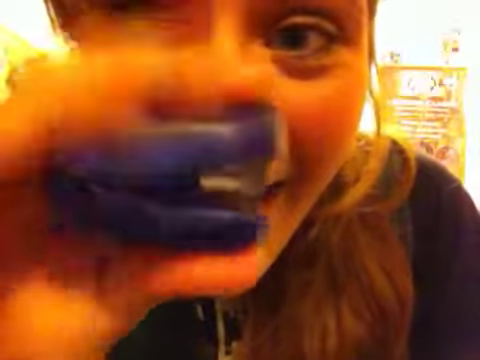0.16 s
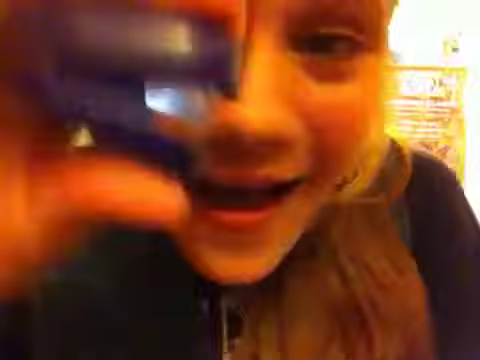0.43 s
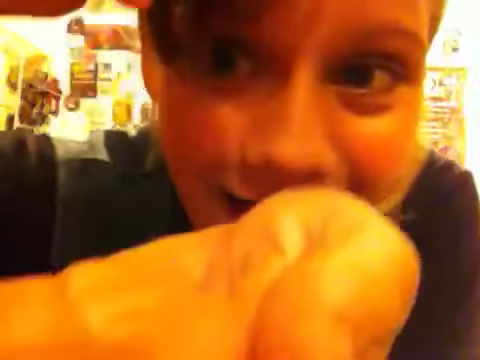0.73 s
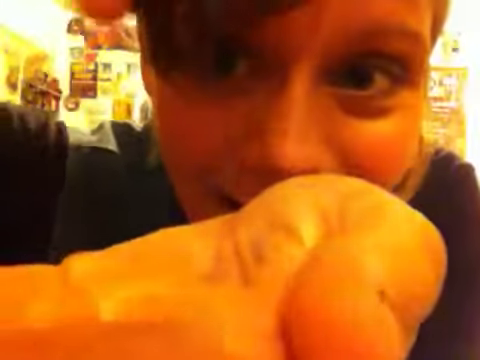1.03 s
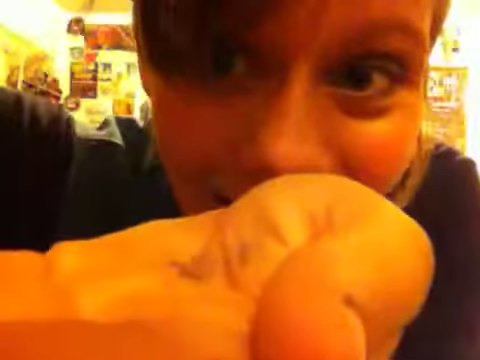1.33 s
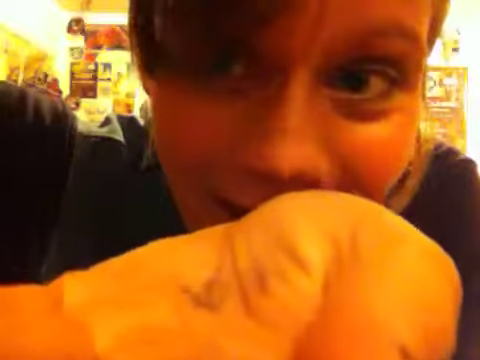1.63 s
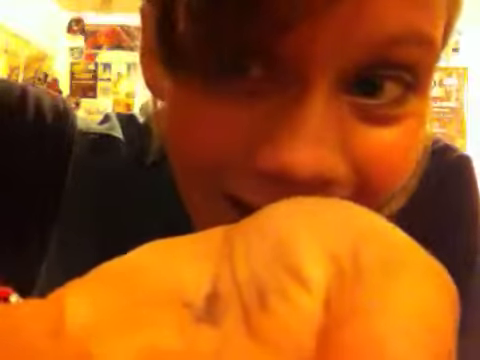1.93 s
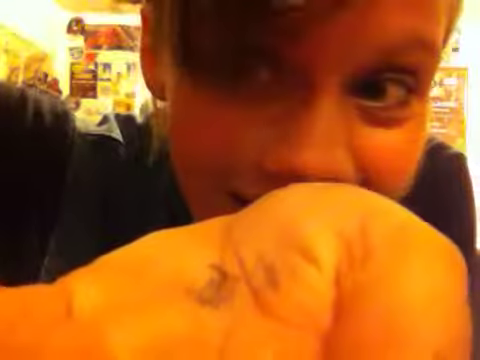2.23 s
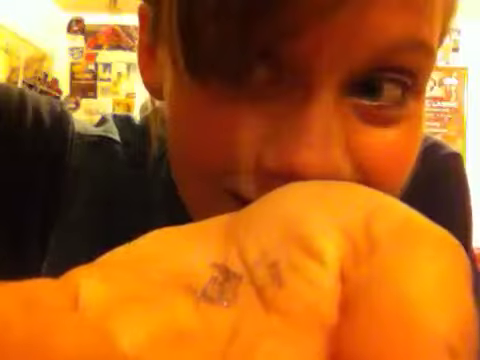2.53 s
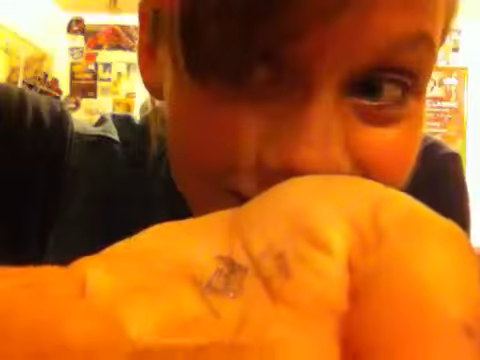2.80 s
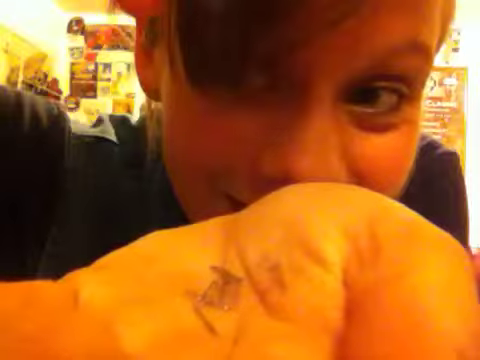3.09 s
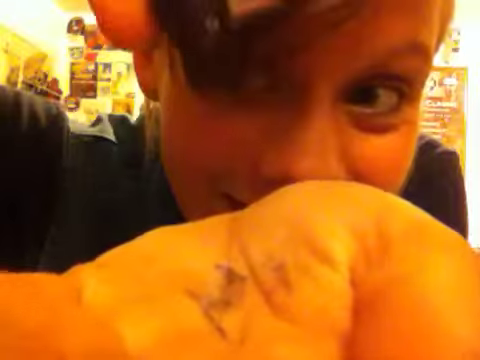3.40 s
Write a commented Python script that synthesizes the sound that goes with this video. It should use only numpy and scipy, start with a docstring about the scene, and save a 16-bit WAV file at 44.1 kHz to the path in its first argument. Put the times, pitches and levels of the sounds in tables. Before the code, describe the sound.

Quick bright metallic snaps of a small stapler squeezed over and over, crowding closer toward the end

```python
"""Low hum and faint hiss are heard first; then a small empty stapler clicks, squeezed again and again nearby.
Each contact of its steel parts is a few ms of noisy force that excites modes of steel, plastic shell and hand.
After some snaps the steel arm rings on, at times a spring sings, and once the hand gives a low bump.
A wall and the bedroom answer briefly; the camera's gain control ducks after loud clicks."""
import sys
import numpy as np
from scipy import signal
from scipy.fft import rfft, irfft, next_fast_len
from scipy.io import wavfile
from scipy.ndimage import uniform_filter1d, map_coordinates

SR = 44100
rng = np.random.default_rng(int(sys.argv[2]) if len(sys.argv) > 2 else 0)


def wav_out(sig):
    """Save sig, one row per channel (or a flat mono array), as 16-bit PCM at SR to the path in sys.argv[1]."""
    wavfile.write(sys.argv[1], SR, np.round(np.clip(np.atleast_2d(sig).T, -1, 1) * 32767).astype(np.int16))


N = 156555  # samples

# Contacts of the steel parts: t/s, energy level/dB, chatter/ms, then shell, treble and thud
# level/dB relative to the steel
CONTACTS = [(0.2647, -17, 6.5, -3.5, -9, -28.5), (0.2751, -15, 2.8, -10, -2, -28),
            (0.314, -2, 0.22, -17.5, -12, -28), (0.3177, -4.5, 0.2, 3, -6, -16),
            (0.3468, 5, 2.5, -8, -9.5, -23), (0.4303, -30, 2.3, -3.5, -1, -8),
            (0.507, -6.5, 0.65, -11.5, 0, -40), (0.5094, 3.5, 0.89, -13, -7.5, -24),
            (0.6702, -33.5, 1.7, -8, -11.5, -31), (0.686, -20.5, 1.8, -7.5, -23.5, -25),
            (0.696, -24, 0.95, -0.5, -1.5, -42), (0.701, -17, 0.32, -8.5, -16.5, -36),
            (0.723, -15.5, 1.2, -18.5, -19, -31), (0.7273, -7.5, 0.23, -7.5, -4, -33),
            (0.7962, -36.5, 1.4, -11, -12.5, -24), (1.0022, -3.5, 0.49, 0.5, -1, -31),
            (1.0096, -9.5, 0.73, -22, 4.5, -18), (1.058, 6, 2.15, -5.5, -8.5, -17),
            (1.0975, -10, 0.71, 3.5, 1.5, -37), (1.1033, 3.5, 1.8, -15, 0.5, -27.5),
            (1.1088, -18.5, 1.8, -17, -12, -20), (1.257, -18.5, 2.2, -7, -9.5, -21),
            (1.268, -22.5, 4.1, -7.5, -11, -31), (1.289, -10, 0.37, -12, -1.5, -31),
            (1.2913, -11, 4, -14, -6.5, -27), (1.471, -6.5, 2.15, -6.5, -3.5, -37.5),
            (1.4828, -14, 1.7, -13, -6, -20), (1.5701, 3.5, 3.25, -7, -7, -18.5),
            (1.5737, -10, 2.6, -6, -24, -17), (1.6047, -1, 2.2, -10, -4, -25),
            (1.61, -3, 0.45, -3.5, -3, -20.5), (1.7404, -17.5, 0.33, -4.5, -5.5, -26),
            (1.7596, -13.5, 2.7, -5, -9.5, -22), (1.7829, -11.5, 2.3, -11.5, -2, -25),
            (1.8042, -25.5, 1.2, -5.5, -6, -21), (1.887, 1, 0.36, -4.5, -5.5, -60),
            (1.8908, -11, 1, -13, -3, -23.5), (1.9306, 5.5, 3, -5.5, -8, -23),
            (1.9445, 0, 0.6, -32, -10, -29), (1.9468, 0.5, 0.66, -8, -4, -19),
            (2.0659, -22, 0.45, -10, -11, -24), (2.0748, -6, 3.7, -14, -16, -28),
            (2.0921, -4, 1.3, -11, -3, -30.5), (2.1415, -32, 1.2, -1, 1, -21),
            (2.1608, -2.5, 2.4, -4.5, -2.5, -32), (2.1641, -8, 1.7, -12, -5, -21.5),
            (2.1915, 2, 1.3, -4.5, -6, -22.5), (2.1935, -1, 0.83, -7, -22, -28),
            (2.2091, 4, 1.3, -9, -12, -24.5), (2.2116, 5, 2, -14, -13, -45),
            (2.31, -19, 1.1, -17, -23, -35), (2.3138, -7.5, 0.43, -12, -26, -29),
            (2.3332, -4.5, 0.36, -15, -2, -34), (2.3698, -30, 0.92, 0, -5, -30),
            (2.3894, -1, 0.88, -6.5, -4.5, -26.5), (2.4319, 0, 3.5, -8.5, -4, -32),
            (2.4351, 2, 1.4, -10.5, -16.5, -22), (2.5316, -20.5, 0.3, -16, -17, -39),
            (2.54, -17, 6.5, -4, -4, -21), (2.5463, -1, 0.87, -13, -23, -21.5),
            (2.5634, -2, 0.27, -17, 0, -32.5), (2.5664, -8, 3.6, -15, -13, -29),
            (2.615, -1, 0.56, -4, -6, -28), (2.6185, -6.5, 0.74, -4, -10, -25),
            (2.636, 4.5, 4, -11, -6, -21), (2.715, -27.5, 2, -26, 4, -59), (2.7478, -19, 2, 2, -12, -23),
            (2.7505, -8.5, 1.4, -1, -19, -25), (2.752, -9, 1, -6.5, -29, -47),
            (2.7555, 4, 2.2, -12, -14, -33), (2.762, -8, 0.3, -18, -2, -32),
            (2.769, 0, 1.4, -14, -5.5, -28.5), (2.8053, -16, 0.7, -6, -2, -38),
            (2.8201, 3, 0.85, -9.5, -7, -30), (2.8227, -15, 0.61, -17, -6, -26),
            (2.8688, -13, 0.66, -10.5, -16, -51), (2.9511, 9, 3.5, -12.5, -9.5, -28.5),
            (3.09, -0.5, 0.95, -14.5, -7, -27), (3.1053, -12, 0.6, -8, -6, -37),
            (3.1056, -4.5, 0.57, -13, -4, -30), (3.157, -26.5, 1.2, 1.5, -9, -26),
            (3.1771, -1, 0.44, -5, -3, -26), (3.1777, -5.5, 0.85, -19.5, -4, -40),
            (3.1975, 3.5, 4.5, -10.5, -9, -21), (3.2213, -27, 3.4, 6, -20, -9),
            (3.2567, 4.5, 1.2, -11.5, -15.5, -22.5), (3.3526, -3, 0.18, -18, -9, -30),
            (3.368, -6, 1.7, -12, -10, -29), (3.4031, 0.5, 0.43, -4, -3, -27),
            (3.4057, -14, 0.68, 2.5, -2, -20), (3.4394, 2, 0.75, -5.5, -11, -22),
            (3.443, 2, 2.9, -8.5, -5.5, -24.5)]
# Modes of the steel parts: f/Hz, width/Hz, level/dB
STEEL_MODES = [(3000, 500, -12), (3650, 450, -4), (4500, 700, -5), (5400, 800, -3), (6230, 700, 0),
               (7000, 700, 0), (7900, 800, 0), (8800, 800, -1)]
# Modes of the plastic shell: f/Hz, width/Hz, level/dB
SHELL_MODES = [(1602, 463, 0), (2094, 478, 5.5), (2316, 763, -4)]
# Highest modes of the stapler: f/Hz, width/Hz, level/dB
TREBLE_MODES = [(9580, 605, 2), (11070, 970, -8.5), (12110, 1000, -9.5), (14860, 1200, -20)]
# Low, broad modes of the hand: f/Hz, width/Hz, level/dB
THUD_MODES = [(90, 98, -11), (260, 350, -6), (550, 503, 2), (1085, 1300, -3.5)]
# Modes of the free steel arm: f/Hz, width/Hz, level/dB
ARM_MODES = [(1760, 50, -9), (2030, 18, -6), (2710, 45, -3), (2950, 50, -1), (3090, 40, 0)]
# Snaps that leave the arm free: t/s, energy level/dB
ARM_RINGS = [(.348, -24), (.51, -21.5), (1.059, -19.5), (1.104, -27), (1.572, -19.5), (1.61, -18.5),
             (1.947, -26.5), (2.213, -31), (2.434, -23), (2.638, -18), (2.952, -27)]
# Modes of the spring: f/Hz, level/dB, t60/s
SPRING_MODES = [(8470, 4, .25), (8720, 4, .45), (8880, 0, 0.74), (9000, 3, 0.66), (9170, -7, 1.2),
                (9430, -6, 1.2)]
# Spring notes: t/s, length until damped/s, level/dB, f/Hz struck hardest, reach/Hz
SPRING_RINGS = [(.512, 0.16, -51, 9430, 150), (0.728, 0.23, -52, 9050, 900),
                (1.292, 0.13, -57.5, 8800, 500), (3.445, .12, -60, 8600, 300)]
# Reverberation time of the room: f/Hz, t60/s
ROOM_DECAY = [(300, 0.05), (800, 0.21), (2000, 0.17), (5500, 0.17), (9000, 0.22), (14000, 0.45)]
# Colour of the reverberation: f/Hz, level/dB
ROOM_COLOUR = [(300, 11), (1000, 6), (1900, 1.5), (3000, 6.5), (8000, -0.5), (11000, -9.5), (15000, -18.5)]
# Relative spectral density of the background: f/Hz, level/dB
FLOOR_SPECTRUM = [(15, -51), (25, -28), (121, -4), (177, -12.5), (266, -15.5), (313, -22.5), (617, -17.5),
                  (809, -21), (927, -21), (1390, -26), (8830, -28), (16500, -46)]

ENERGY_S = .0005  # an energy level of 0 dB is full scale for this long
LEAD_S, LEAD_DB, RISE_S = .0045, -8.5, .0001  # scrape before the contact; rise of the contact
SETTLE_T60_S, LINGER_DB, LINGER_T60_S = .0098, .5, .029  # quick settling; longer rattle
BLOW_AT, BLOW_DB, BLOW_T60_S = .43, 8, .0029  # share of the chatter before the hardest blow
TICKS_PER_S, TICK_DB, TICK_T60_S = 170, -5.5, .26
SPIKY_DB = 6.5  # standard deviation of the force level from sample to sample
MODE_SCATTER_DB, MODE_DETUNE = 2.5, .03  # standard deviations; detuning as a share of pitch
STEEL_LOW_HZ, MIC_LOW_HZ = 1200, 40
WALL_S, WALL_DB = .0235, -30
ROOM_DB, ROOM_GAP_S = -23.5, .0065
ARM_SHAKE_T60_S = .12
SPRING_WAVER_HZ, SPRING_DAMP_S = 70, .06
THUMP_S, THUMP_HZ, THUMP_DB, THUMP_T60_S, THUMP_RISE_S = 3.2572, 178, -13, .013, .0005
FLOOR_DB, PATCHY_DB = -58, 1.3
KNEE_DB, SQUEEZE, RECOVER_DB_PER_S = -36.5, .19, 78  # SQUEEZE is dB of cut per dB above the knee
CEILING, HARDNESS = .74, 6
RUMBLE_CUT_HZ, ROLL_OFF_HZ, ROLL_OFF_DB, TOP_HZ = 28, 15200, -40.5, 16900


def stapler():
    """Modal excitation: one contact force drives all the bodies, and a wall and the room reflect them."""
    out = np.zeros(N)
    t = np.arange(8192) / SR - LEAD_S
    impulse = 1. * (t == t[0])
    unit = np.sqrt(ENERGY_S * SR)
    for s, db, chatter_ms, shell_db, treble_db, thud_db in CONTACTS:
        push = contact_force(t, chatter_ms / 1000)
        bodies = [(STEEL_MODES, db, STEEL_LOW_HZ),
                  (SHELL_MODES, db + shell_db, STEEL_LOW_HZ),
                  (TREBLE_MODES, db + treble_db, STEEL_LOW_HZ),
                  (THUD_MODES, db + thud_db, MIC_LOW_HZ)]
        steel, shell, treble, thud = [unit * amp(level) * rung(push, modes, 1.0, low_hz)
                                      for modes, level, low_hz in bodies]
        # the room gets the colour averaged over all directions: modes without scatter
        mean = unit * sum(amp(level) * rung(impulse, modes, 0, low_hz) for modes, level, low_hz in bodies)
        add(out, s - LEAD_S, steel + shell + treble + thud)
        add(out, s - LEAD_S + WALL_S, amp(WALL_DB) * (steel + shell))
        add(out, s, amp(ROOM_DB) * signal.fftconvolve(mean, room_tail()))
    return out


def contact_force(t, chatter_s):
    """Chattering impact: scrape, blow, chatter, settling, rattle and stray ticks of loose parts shape noise."""
    after = np.maximum(t - chatter_s, 0)
    chatter = amp(-60 * after / SETTLE_T60_S)
    rattle = amp(LINGER_DB - 60 * t / LINGER_T60_S)
    blow = amp(BLOW_DB - 60 * abs(t - BLOW_AT * chatter_s) / BLOW_T60_S)
    contact = (chatter + rattle + blow) * np.clip(t / RISE_S, 0, 1)
    scrape = amp(LEAD_DB) * (1 + t / LEAD_S) ** 2 * (t < 0)
    struck = rng.random(len(t)) < TICKS_PER_S / SR
    ticks = amp(TICK_DB - 60 * t / TICK_T60_S) * struck * (t > 0)
    spikes = amp(SPIKY_DB * rng.standard_normal(len(t)))
    return (contact + scrape + ticks) * rng.standard_normal(len(t)) * spikes


def rung(push, modes, spread, low_hz):
    """Forced resonance, scaled to energy 1: a small body radiates little under low_hz."""
    f = np.fft.rfftfreq(len(push), 1 / SR)
    response = modes_at(f, modes, spread) * high_pass(f, low_hz)
    sound = irfft(rfft(push) * response, len(push))
    return sound / np.linalg.norm(sound)


def modes_at(f, modes, spread):
    """Modal superposition of causal resonances; spread scales the chance change of strength and pitch."""
    total = 0
    for k, (hz, width, db) in enumerate(modes):
        strength = (-1) ** k * amp(db + spread * MODE_SCATTER_DB * rng.normal())
        tuned = hz * (1 + spread * MODE_DETUNE * rng.normal())
        damping = 1j * f * width
        total = total + strength * damping / (tuned ** 2 - f * f + damping)
    return total


def arm():
    """Free vibration under decaying noise: after a hard snap loose parts shake the steel arm, which rings on."""
    out, t = np.zeros(N), np.arange(16384) / SR
    for s, db in ARM_RINGS:
        push = rng.standard_normal(len(t)) * amp(-60 * t / ARM_SHAKE_T60_S)
        add(out, s, amp(db) * np.sqrt(ENERGY_S * SR) * rung(push, ARM_MODES, .5, STEEL_LOW_HZ))
    return out


def spring():
    """Damped free vibration: close high modes waver and die at their own speeds until a finger damps them."""
    out = np.zeros(N)
    for s, length, db, struck_hz, reach_hz in SPRING_RINGS:
        t = np.arange(round(length * SR)) / SR
        ring = 0
        for hz, level, t60 in SPRING_MODES:
            knots = rng.standard_normal((2, 64))
            a, b = [map_coordinates(k, [t * SPRING_WAVER_HZ]) for k in knots]
            # modes away from the one struck hardest are weaker
            far = min(abs(hz - struck_hz) / reach_hz, 2) ** 2
            phase = 2 * np.pi * hz * t
            wavering = (1 + a) * np.sin(phase) + b * np.cos(phase)
            ring = ring + amp(level - 6 * far - 60 * t / t60) * wavering
        add(out, s, amp(db) * ring * np.clip((length - t) / SPRING_DAMP_S, 0, 1))
    return out


def thump():
    """Damped oscillation of a single mode: one low bump of the hand."""
    out, t = np.zeros(N), np.arange(SR // 10) / SR
    envelope = amp(THUMP_DB - 60 * t / THUMP_T60_S) * (1 - np.exp(-t / THUMP_RISE_S))
    add(out, THUMP_S, envelope * np.cos(2 * np.pi * THUMP_HZ * t))
    return out


def room_tail():
    """Diffuse reverberation: a fresh noise tail, of energy 1, in which each frequency dies at its own speed."""
    hz, t, z = signal.stft(rng.standard_normal(SR // 4), SR, nperseg=256)
    decay_db = -60 * t / along(ROOM_DECAY, hz)[:, None]
    colour_db = along(ROOM_COLOUR, hz)[:, None]
    tail = signal.istft(z * amp(decay_db + colour_db), SR, nperseg=256)[1]
    tail = tail * np.clip(np.arange(len(tail)) / SR / ROOM_GAP_S, 0, 1) ** 2
    return tail / np.linalg.norm(tail)


def quiet_room():
    """Stationary noise, spectrally shaped: hum of the house, swelling in patches, and hiss of the microphone."""
    hz, _, z = signal.stft(rng.standard_normal(N), SR, nperseg=2048)
    field = uniform_filter1d(rng.standard_normal(z.shape), size=5, axis=0)
    field = uniform_filter1d(field, size=4, axis=1)
    low = (hz < STEEL_LOW_HZ)[:, None]  # only the lows swell
    patches = amp(PATCHY_DB * field / field.std() * low)
    air = signal.istft(z * patches, SR, nperseg=2048)[1][:N]
    air = filtered(air, lambda hz: amp(along(FLOOR_SPECTRUM, hz)) * (hz > 20))
    return amp(FLOOR_DB) * air / air.std()


def high_pass(f, hz):
    """Second-order radiation or pickup limit: a causal high-pass response."""
    s = 1j * f / hz
    return s * s / (s * s + np.sqrt(2) * s + 1)


def filtered(x, response):
    """Linear filtering: the spectrum of x times a response of frequency."""
    m = next_fast_len(N + SR // 2)
    return irfft(rfft(x, m) * response(np.fft.rfftfreq(m, 1 / SR)), m)[..., :N]


def along(points, hz):
    """Interpolation of (f/Hz, value) points on a logarithmic frequency axis."""
    f, v = np.transpose(points)
    return np.interp(np.log(hz + 1), np.log(f + 1), v)


def amp(db):
    """Level to amplitude ratio: 20 dB is a factor of ten."""
    return 10 ** (np.asarray(db) / 20)


def add(track, s, sound):
    """Superposition: mix a sound in at time s."""
    part = track[max(round(s * SR), 0):][:len(sound)]
    part += sound[:len(part)]


def scene():
    """Superposition of all sources in one channel."""
    return (stapler() + arm() + spring() + thump() + quiet_room())[None]


def record(dry):
    """Compression and band-limiting: gain drops at once on a peak and recovers slowly under a soft ceiling."""
    slope = RECOVER_DB_PER_S * np.arange(N) / SR
    level_db = 20 * np.log10(abs(dry) + 1e-9)
    # a peak hold that falls at a steady rate
    held_db = np.maximum.accumulate(level_db + slope, axis=1) - slope
    excess_db = uniform_filter1d(np.maximum(held_db - KNEE_DB, 0), size=9, axis=1)
    x = dry * amp(-SQUEEZE * excess_db)
    x = x / (1 + abs(x / CEILING) ** HARDNESS) ** (1 / HARDNESS)

    def band(hz):
        """Band limits: a rumble cut below, a roll-off and a sharp edge above."""
        roll = amp(ROLL_OFF_DB * np.clip((hz - ROLL_OFF_HZ) / (TOP_HZ - ROLL_OFF_HZ), 0, 1) ** 2)
        return high_pass(hz, RUMBLE_CUT_HZ) * roll * (hz < TOP_HZ)

    return filtered(x, band)


dry = scene()
out = record(dry)
wav_out(out)
```